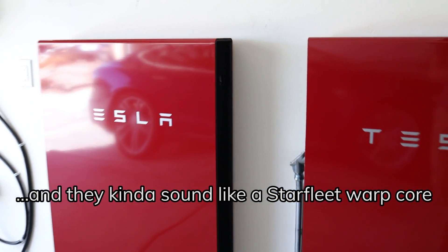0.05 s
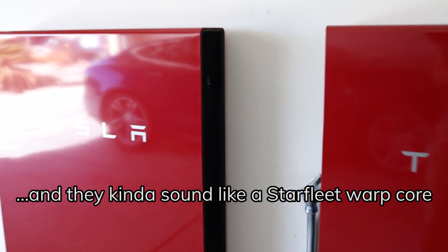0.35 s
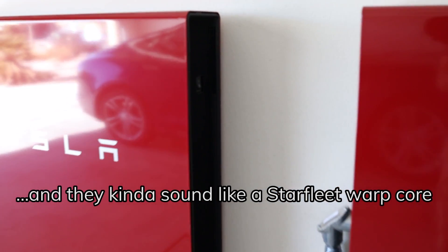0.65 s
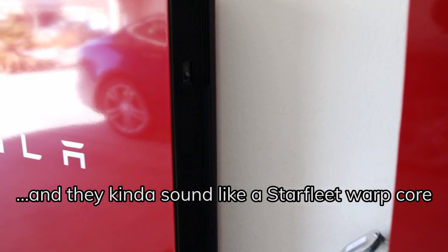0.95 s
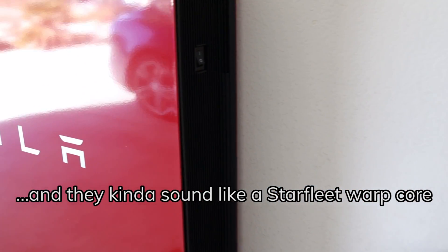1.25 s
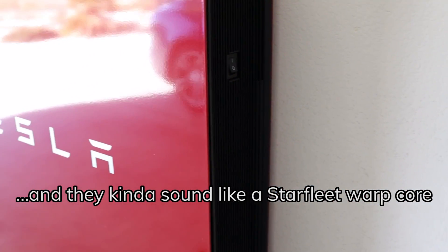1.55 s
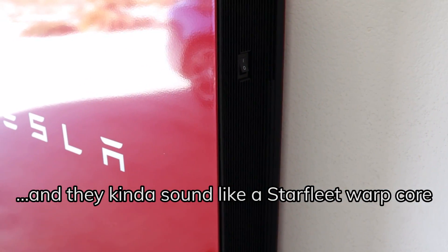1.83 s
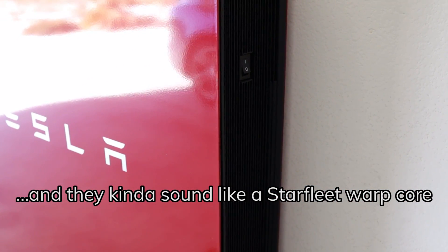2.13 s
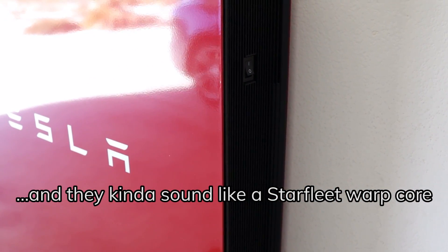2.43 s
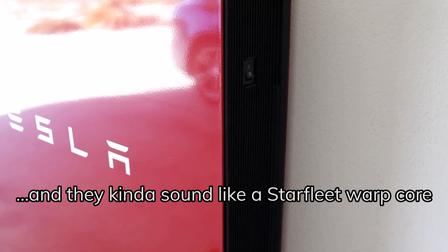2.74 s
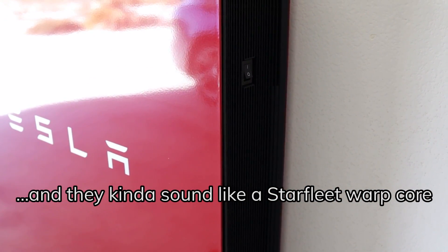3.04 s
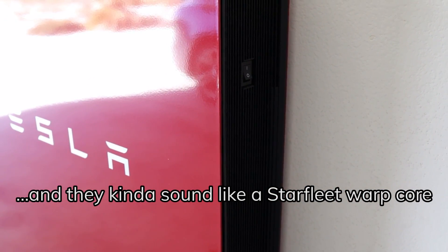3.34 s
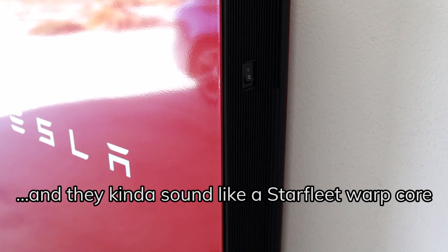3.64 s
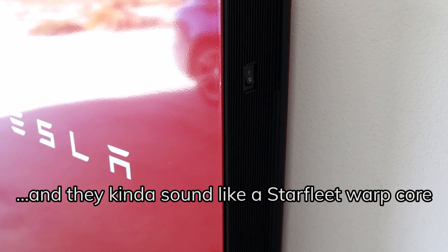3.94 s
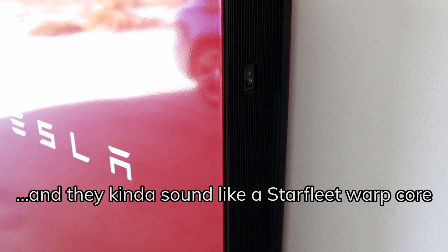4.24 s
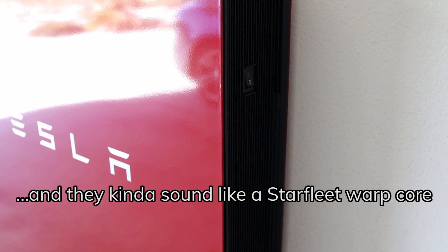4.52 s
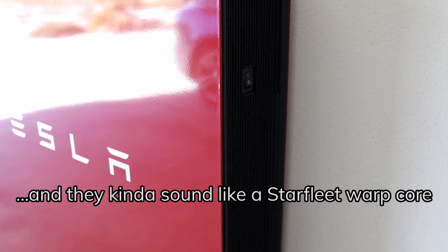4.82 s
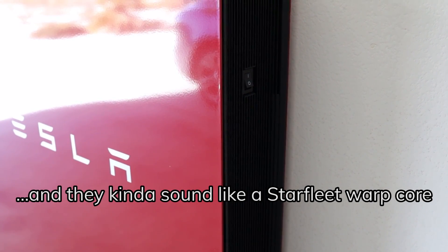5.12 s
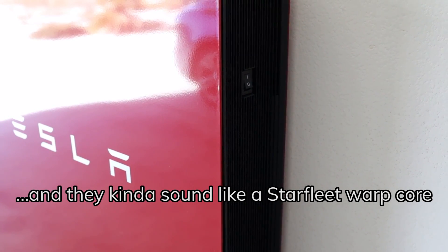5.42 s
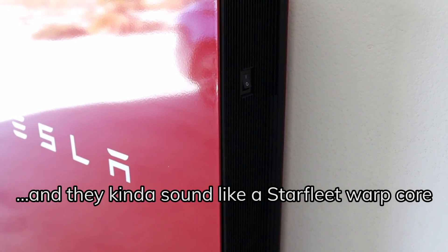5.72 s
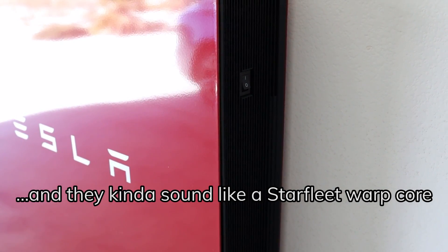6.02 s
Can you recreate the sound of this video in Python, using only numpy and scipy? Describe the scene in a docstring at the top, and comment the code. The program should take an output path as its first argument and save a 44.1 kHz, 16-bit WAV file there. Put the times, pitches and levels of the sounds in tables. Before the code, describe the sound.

The microphone moves close to wall-mounted home batteries in a garage, and their sound rises for about a second before levelling off. A cooling fan makes a deep, resonant hum that pulses quickly and fairly evenly throughout. Under the throb, air rumbles and hisses softly through the vent, while the inverter adds a constant mains buzz and very faint, wavering high tones.

```python
"""A garage, the microphone close to wall-mounted home batteries that are cooling themselves.
The fan speed hunts up and down about 2.5 times a second, sweeping its blade tones across the resonances
of cabinet and room: a low throb. Under it lie rushing air, mains buzz and the thin whine of the inverter.
Everything comes up over the first second as the microphone moves in, passing the side vent."""
import sys
import numpy as np
from scipy import signal
from scipy.fft import rfft, irfft, next_fast_len
from scipy.io import wavfile

SR = 44100
rng = np.random.default_rng(int(sys.argv[2]) if len(sys.argv) > 2 else 0)


def to_wav(s):
    """Save 16-bit WAV."""
    ch = np.atleast_2d(s).T  # columns
    pcm = np.round(np.clip(ch, -1, 1) * 32767)  # PCM
    wavfile.write(sys.argv[1], SR, pcm.astype(np.int16))


N = 272097
TIME = np.arange(N) / SR


def gain_of(db):
    return 10 ** (np.asarray(db) / 20)


def noise(spectrum):
    """Random noise shaped by rows of frequency_hz, density_db."""
    size = 2 * next_fast_len(N // 2 + 1)
    hz = np.fft.rfftfreq(size, 1 / SR)
    points_hz, density_db = np.transpose(spectrum)
    shape = gain_of(np.interp(np.log(hz + 1), np.log(points_hz + 1), density_db))
    white = rng.standard_normal(size) * np.sqrt(SR / 2)
    return irfft(rfft(white) * shape)[:N]


def drift(rate_hz):
    """A slow random wander of about unit size."""
    steps = rng.standard_normal(1024)
    return 1.13 * np.interp(TIME * rate_hz, np.arange(len(steps)), steps)


def swell(peak_s, half_width_s):
    """A smooth rise to 1 and fall around a moment."""
    return np.exp(-((TIME - peak_s) / half_width_s) ** 2)


def tone(pitch_hz, rms_db, phase, waver_db, waver_hz):
    """A steady pitch whose level wavers."""
    amplitude = np.sqrt(2) * gain_of(rms_db + waver_db * drift(waver_hz))
    return amplitude * np.cos(2 * np.pi * pitch_hz * TIME + phase)


# How fast the fan's speed controller hunts: time_s, swings_per_s
HUNTING = [(0.0, 2.563), (0.98, 2.757), (1.38, 2.479), (2.56, 2.608), (4.02, 2.422), (4.16, 2.618),
           (5.28, 2.671), (6.17, 2.275)]


def blade_pitch(target_hz=85.96, slew_hz_per_s=160, start_swing=0.1553):
    """The controller overshoots each way; the slower a swing, the further the blade-pass pitch strays."""
    swings_per_s = np.interp(TIME, *np.transpose(HUNTING))
    swings = start_swing + np.cumsum(swings_per_s) / SR  # counted from top speed
    reach_hz = slew_hz_per_s / (2 * np.pi * swings_per_s)
    return target_hz + reach_hz * np.cos(2 * np.pi * swings)


def fan(inflow_depth=0.051, inflow_hz=20):
    """Each passing blade gives a pressure pulse; the top harmonics swell as the motor pulls the speed up."""
    pitch_hz = blade_pitch()
    passes = np.cumsum(pitch_hz) / SR
    torque = np.maximum(np.gradient(pitch_hz), 0)
    strain = gain_of(-1.0) * torque / torque.max()
    blades = np.zeros(N)
    for harmonic, strength in enumerate([1, gain_of(-0.11), 1, strain, strain], start=1):
        uneven_inflow = 1 + inflow_depth * drift(inflow_hz)
        blades += strength * uneven_inflow * np.sin(2 * np.pi * harmonic * passes)
    return blades


# Resonances of cabinet and garage, at the microphone: pitch_hz, width_hz, gain_db, polarity
RESONANCES = [(80.7, 4.1, -17.1, 1), (85.6, 9.8, -29.6, -1), (95.4, 2.5, -17.7, 1), (101, 4.7, -13, -1),
              (163.9, 2.9, -20.5, -1), (168, 25, -37, 1), (169.3, 5, -18.8, -1), (178.3, 10.4, -24.8, 1),
              (186.7, 17, -30.5, -1), (203, 6, -21.5, 1), (231.5, 6.1, -43, 1), (245, 8.7, -34.3, -1),
              (258.3, 9.2, -41.5, 1), (273.7, 9.9, -43.5, 1), (334, 22, -45.5, 1), (425, 40, -56, -1)]


def cabinet_and_room(blades):
    """Each resonance swells as a tone sweeps through it, rings on, and beats against the departing tone."""
    size = next_fast_len(N + SR, real=True)
    hz = np.fft.rfftfreq(size, 1 / SR) + 1e-6
    response = 0
    for pitch_hz, width_hz, gain_db, polarity in RESONANCES:
        detuning = (hz ** 2 - pitch_hz ** 2) / (hz * width_hz)
        response += polarity * gain_of(gain_db) / (1 + 1j * detuning)
    return irfft(rfft(blades, size) * response, size)[:N]


# Deep buffeting of the moving air, base spectrum: frequency_hz, density_db
BUFFET_SPECTRUM = [(5, -70), (12, -74), (21, -58.5), (30, -51), (38, -64.5), (48, -66), (80, -90),
                   (200, -120)]
# Gusts in the buffeting: peak_s, boost_db
BUFFET_GUSTS = [(.88, 3), (1.5, 10), (2.05, 4), (5.2, 11), (5.63, 8)]
# Turbulence in the duct, base spectrum: frequency_hz, density_db
DUCT_SPECTRUM = [(30, -66), (48, -58.5), (70, -57.5), (98, -45), (122, -59), (140, -55), (185, -55),
                 (215, -73.5), (290, -71.5), (340, -74.5), (410, -79.5), (650, -83.5), (950, -92.5),
                 (2000, -125)]
# Air through the grille, base spectrum: frequency_hz, density_db
GRILLE_SPECTRUM = [(300, -105), (900, -92), (1300, -92), (1750, -90), (2150, -93.5), (2550, -94),
                   (3100, -97), (5500, -100), (9000, -100.5), (9800, -97), (10900, -102), (15500, -102.5)]


def airflow(buffet_db=1.5, lumps_db=1.0, lumps_hz=7, vent_rumble_db=0.5, vent_hiss_db=0.8):
    """Air buffets in gusts, rumbles unevenly in the duct and hisses smoothly through the grille."""
    gusts_db = sum(boost_db * swell(peak_s, half_width_s=0.095) for peak_s, boost_db in BUFFET_GUSTS)
    at_vent = swell(peak_s=1.2, half_width_s=0.64)  # the microphone passes the side vent
    buffet = noise(BUFFET_SPECTRUM) * gain_of(buffet_db + gusts_db)
    rumble = noise(DUCT_SPECTRUM) * gain_of(lumps_db * drift(lumps_hz) + vent_rumble_db * at_vent)
    hiss = noise(GRILLE_SPECTRUM) * gain_of(vent_hiss_db * at_vent)
    return buffet + rumble + hiss


# Buzz of the inverter's coils, from close up: mains_harmonic, level_db
COIL_HARMONICS = [(2, -47), (4, -51), (6, -66), (8, -64), (9, -67), (10, -59.8), (11, -74), (12, -58.7),
                  (14, -73), (16, -70.8), (18, -63), (20, -64.5), (22, -73), (24, -69), (26, -78),
                  (28, -61.1), (30, -65.8), (36, -83), (38, -73.7), (40, -73.8), (41, -83.5), (42, -79),
                  (43, -84), (44, -79.5), (50, -83.5)]


def coil_buzz(mains_hz=60, smear_rad=0.7):
    """The inverter's coils tick at each half cycle of the mains."""
    # the casing smears each tick: neighbouring harmonics stay in step, distant ones do not
    phases = np.cumsum(smear_rad * rng.standard_normal(len(COIL_HARMONICS)))
    return sum(tone(harmonic * mains_hz, level_db, phase, waver_db=0.55, waver_hz=4.04)
               for (harmonic, level_db), phase in zip(COIL_HARMONICS, phases))


# Switching tones of the inverter, from close up: pitch_hz, level_db
SWITCHING_TONES = [(4240, -85), (7680, -86), (9419, -85.5), (9720, -84.5), (9781, -85), (12867, -86.5),
                   (14835, -80.5), (14955, -79), (15075, -85), (15195, -80.5)]


def switching_whine():
    """The inverter's switching gives faint, high, wavering tones."""
    return sum(tone(pitch_hz, level_db, phase=2 * np.pi * rng.random(), waver_db=4.0, waver_hz=3)
               for pitch_hz, level_db in SWITCHING_TONES)


# Rise of the whole scene as the microphone comes close: time_s, gain_db
APPROACH = [(0, -9.5), (.2, -6), (.5, -4.5), (.8, -2), (1.1, -0.7), (3.5, -0.07), (6.17, 0)]


def scene():
    """One microphone moves in: all sources come up together over the first second, then hold."""
    closeness = gain_of(np.interp(TIME, *np.transpose(APPROACH)))
    throb = cabinet_and_room(fan())
    batteries = throb + airflow() + coil_buzz() + switching_whine()
    return (closeness * batteries)[None]


def record(dry, edge_hz=15800):
    """The recorder's band limit cuts off the highest treble."""
    lowpass = signal.firwin(1023, edge_hz, window=("kaiser", 9), fs=SR)
    return signal.oaconvolve(dry, lowpass[None], "same")


dry = scene()
out = record(dry)
to_wav(out)
```